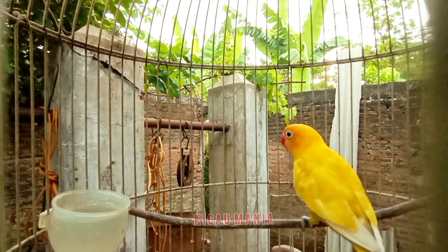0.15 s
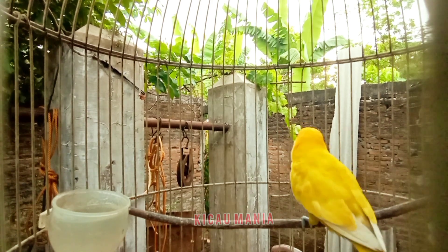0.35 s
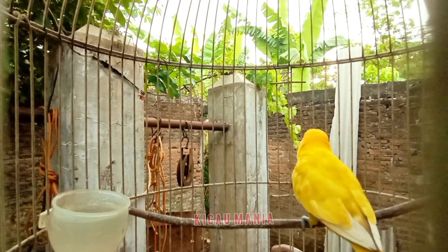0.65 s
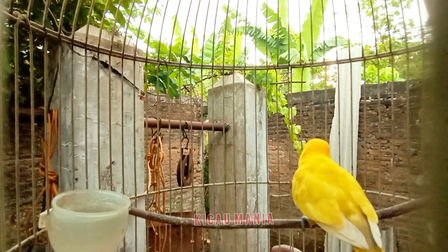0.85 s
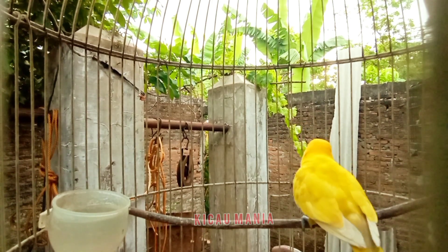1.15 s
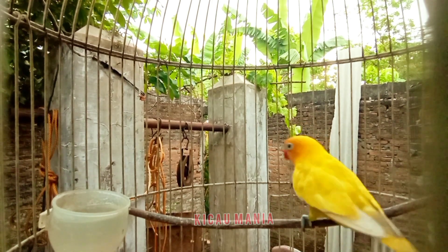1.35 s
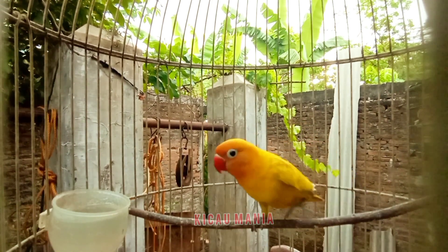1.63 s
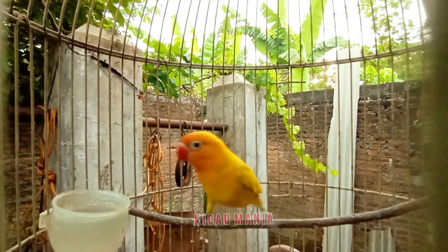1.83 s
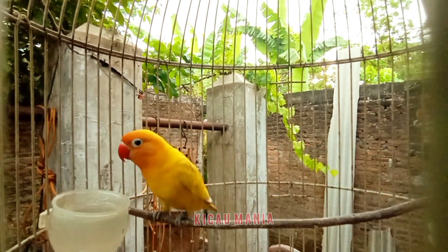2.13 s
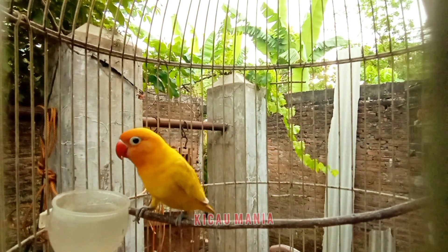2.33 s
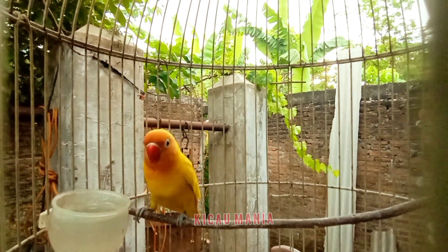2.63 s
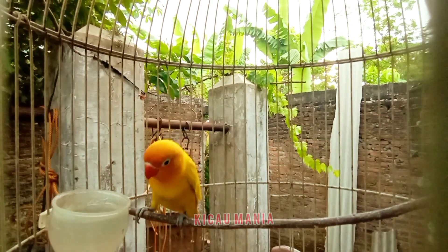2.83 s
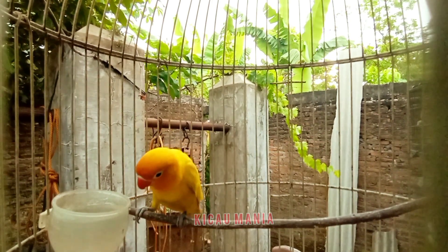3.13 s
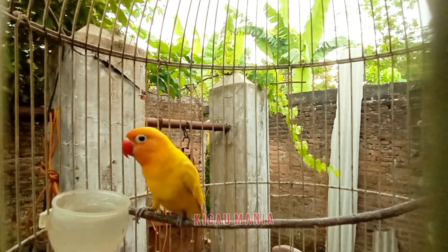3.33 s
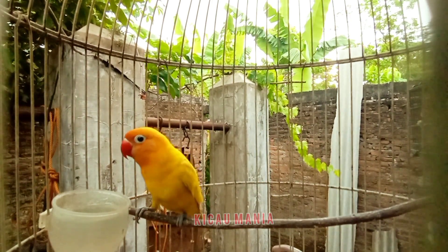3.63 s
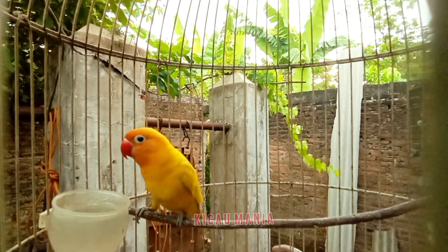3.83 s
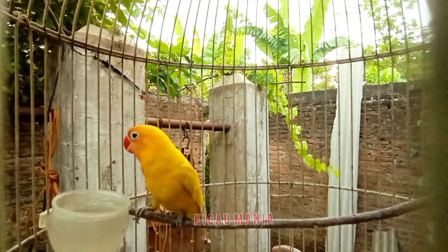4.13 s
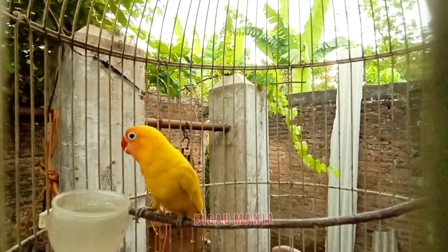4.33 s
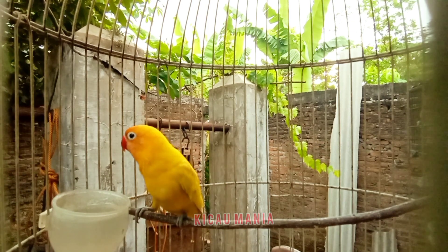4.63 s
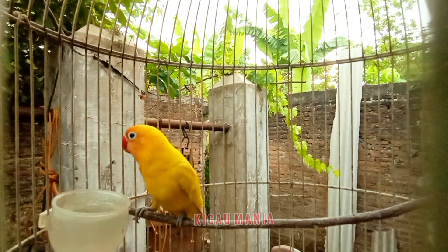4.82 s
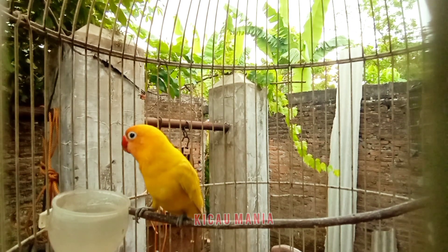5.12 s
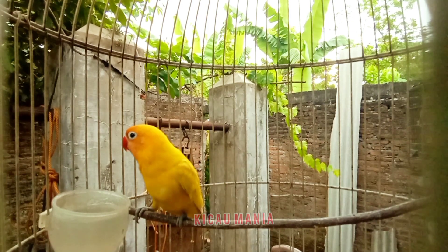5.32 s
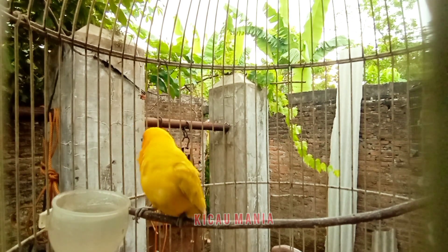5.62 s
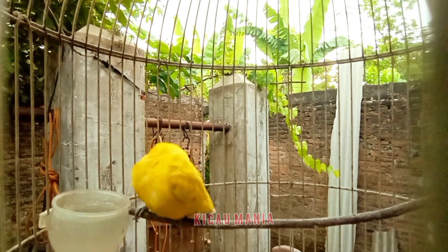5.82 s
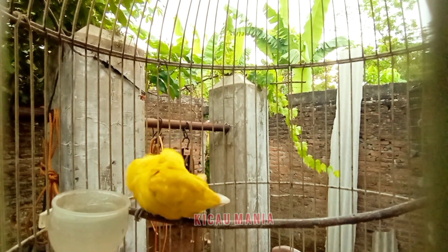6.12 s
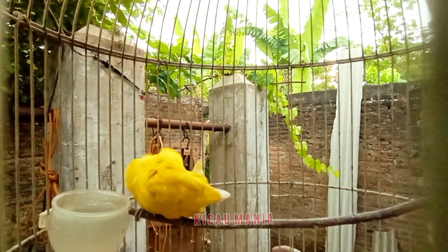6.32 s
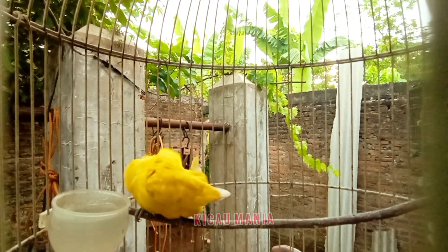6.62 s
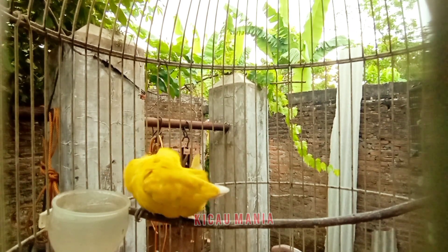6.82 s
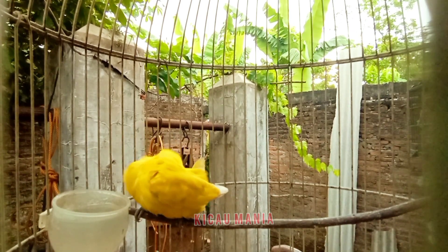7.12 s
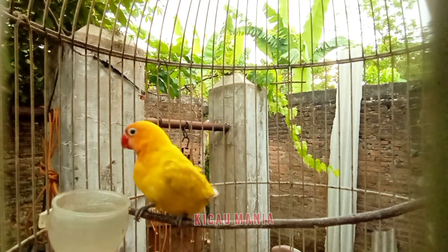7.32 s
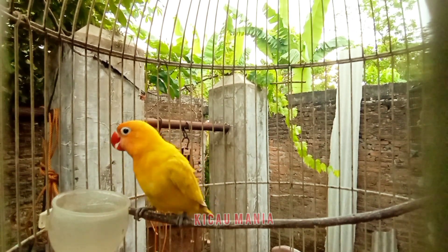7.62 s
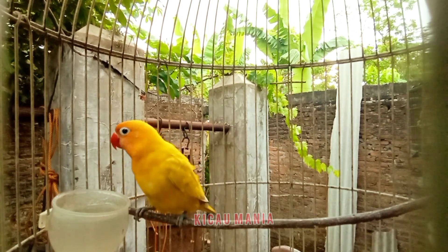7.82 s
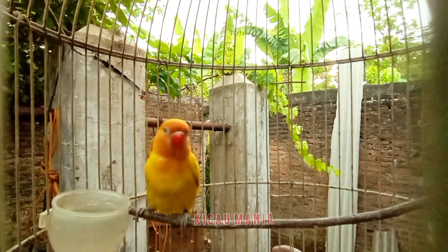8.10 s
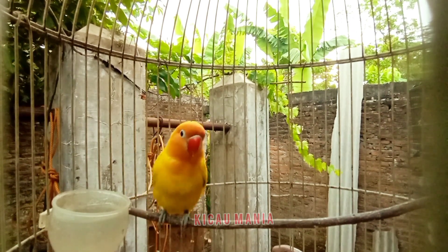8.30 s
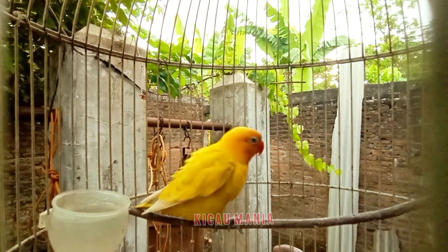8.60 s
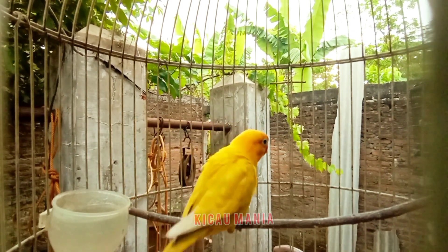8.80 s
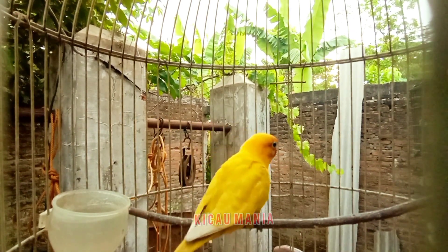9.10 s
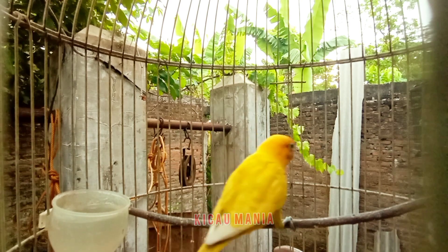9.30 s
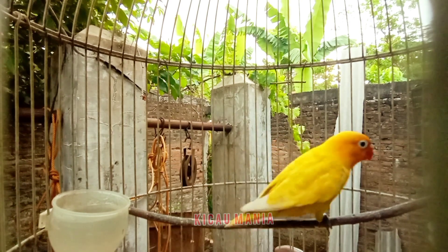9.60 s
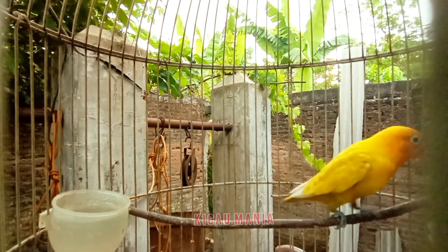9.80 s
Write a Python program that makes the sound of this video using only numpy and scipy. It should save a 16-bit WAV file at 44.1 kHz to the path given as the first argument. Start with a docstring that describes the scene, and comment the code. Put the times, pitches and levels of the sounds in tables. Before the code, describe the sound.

Very close to the microphone, a small parrot gives two tiny ticks, two zigzag chirps, then seven piercing short peeps. After a pause comes a chirp, a rising call and a squawk with a squeal. A brief feather rustle follows, then two peeps, another squawk and a steady run of eight loud chirps. Faint birds twitter and trill in a walled garden while engines and traffic rumble low.

```python
"""A caged lovebird calls close to a microphone in a walled garden: zigzag chirps, pure peeps, ticks, one rise
and two squawks, each a gliding harmonic tone filtered by the beak and thrown back by posts and walls.
Farther birds are whistled sines in reverberation; two engines are sums of exhaust orders; traffic is
coloured noise. The recorder's limiter ducks everything under the loudest calls."""
import sys
import numpy as np
from scipy import signal
from scipy.fft import rfft, irfft, next_fast_len
from scipy.io import wavfile
from scipy.ndimage import uniform_filter1d, map_coordinates

SR = 44100
rng = np.random.default_rng(int(sys.argv[2]) if len(sys.argv) > 2 else 0)


def store_wav(level_fs):
    """Save 16-bit WAV to argv[1]."""
    pcm = np.round(np.clip(np.atleast_2d(level_fs), -1, 1) * 32767)
    wavfile.write(sys.argv[1], SR, pcm.T.astype(np.int16))


N = 438794
TIME = np.arange(N) / SR
TOP_HZ = 15900  # upper band limit


def amp(db):
    """Decibel law: 20 dB is a tenfold amplitude."""
    return 10 ** (np.asarray(db) / 20)


def unit(x):
    """Normalization: scale to an rms of 1."""
    return x / np.sqrt(np.mean(x ** 2) + 1e-20)


def bell(t, centre, width):
    """Gaussian bump of height 1, falling to 1/e at width from the centre."""
    return np.exp(-((t - centre) / width) ** 2)


def along(points, hz):
    """Logarithmic frequency scale: interpolate (Hz, value) points on a log axis."""
    f, v = np.transpose(points)
    return np.interp(np.log(hz + 1), np.log(f + 1), v)


def curves(rows, t):
    """Linear interpolation: each column after the time, read at the times t."""
    s, *cols = np.transpose(rows)
    return [np.interp(t, s, c) for c in cols]


def wobble(rate, size):
    """Band-limited random modulation: a smooth curve through rate random knots a second."""
    knots = rng.standard_normal(int(size * rate / SR) + 4)
    return map_coordinates(knots, [np.arange(size) * rate / SR])


def filtered(x, response):
    """Linear filtering: the spectrum of x times a response of frequency."""
    m = next_fast_len(N + SR // 2)
    return irfft(rfft(x, m) * response(np.fft.rfftfreq(m, 1 / SR)), m)[..., :N]


def noise(spectrum, patchy_db=0):
    """Spectral shaping: coloured noise of rms 1, with drifting louder and softer patches."""
    z = signal.stft(rng.standard_normal(N), nperseg=1024)[2]
    field = uniform_filter1d(rng.standard_normal(z.shape), size=6, axis=0)
    field = uniform_filter1d(field, size=9, axis=1)
    patched = signal.istft(z * amp(patchy_db * unit(field)), nperseg=1024)[1][:N]
    return unit(filtered(patched, lambda hz: amp(along(spectrum, hz))))


def add(track, s, x):
    """Superposition: mix x into the track from second s on."""
    part = track[..., max(round(s * SR), 0):][..., :x.shape[-1]]
    part += x[..., :part.shape[-1]]


def envelope(size, attack_s, release_s):
    """Amplitude envelope: linear attack, hold and release."""
    t = np.arange(size) / SR
    return np.clip(np.minimum(t / attack_s, (t[-1] - t) / release_s), 0, 1)


def gesture(shape, stretch, ratio):
    """Joint frequency and amplitude modulation: pitch and strength of one note, sample by sample."""
    t = np.arange(int(shape[-1][0] * stretch * SR)) / SR / stretch
    hz, db = curves(shape, t)
    return hz * ratio, amp(db) * envelope(len(t), 0.00061, .0005)


# Reverberation of the garden. Each row: frequency in Hz, time to decay by 60 dB in seconds.
GARDEN = [(500, .3), (2500, 0.29), (5000, 0.33), (6500, 0.32), (10000, 0.32), (15000, 0.23)]


def garden_tail():
    """Diffuse reverberation: walls and leaves answer with decaying noise of energy 1."""
    hz, t, z = signal.stft(rng.standard_normal(SR // 2), SR, nperseg=256)
    decay_db = -60 * t / along(GARDEN, hz)[:, None]
    tail = signal.istft(z * amp(decay_db), SR, nperseg=256)[1]
    tail *= 1 - np.exp(-np.arange(len(tail)) / SR / 0.0091)  # gradual build-up
    return tail / np.linalg.norm(tail)


def near_echoes(count=10):
    """Early reflection: sharp echoes from the cage floor, cup and posts, of energy 1."""
    delay_s = rng.uniform(.002, .024, count)
    size = rng.choice([-1, 1], count) * np.exp(-delay_s / 0.013)
    return np.bincount((delay_s * SR).astype(int), size / np.linalg.norm(size))


# Course of the distant traffic. Each row: time in seconds, rumble in dB (before a 1.5 dB cut), tyre rush in dB.
TRAFFIC = [(0, -48.5, -59.5), (2.5, -53, -63), (3.4, -52.5, -63.5), (3.9, -54, -51.5), (6.4, -51, -48.5),
           (7.5, -49.5, -53), (8.8, -46, -45), (9.95, -48, -41.5)]
# Swells of the rush. Each row: peak time in seconds, time from peak to 1/e in seconds, peak level in dB.
SWELLS = [(5.46, .15, -44.5), (8.3, 0.14, -38.5), (9.5, 0.69, -41.5)]
# Spectrum of the rumble. Each row: frequency in Hz, relative level in dB per Hz.
RUMBLE = [(20, -38.5), (45, -20.5), (75, -7.5), (110, -1.5), (167, -6), (233, -7), (377, -12), (600, -16.5),
          (900, -27), (1500, -69.5)]
# Spectrum of the tyre rush. Each row: frequency in Hz, relative level in dB per Hz.
RUSH = [(300, -2.5), (600, -0.5), (1000, 1), (1130, -0.5), (1250, 9.5), (1420, 0), (2000, 1), (2800, -10),
        (4300, -16), (7000, -23), (10000, -36), (15500, -39.5)]


def traffic():
    """Incoherent summation: low rumble, and a rush whose power swells as vehicles go by."""
    rumble_db, rush_db = curves(TRAFFIC, TIME)
    rumble = amp(rumble_db - 1.5 + 1.3 * wobble(7, N)) * noise(RUMBLE, patchy_db=2.5)
    swell_power = sum((amp(db) * bell(TIME, s, width)) ** 2 for s, width, db in SWELLS)
    rush_level = np.sqrt(amp(rush_db) ** 2 + swell_power)
    rush = rush_level * amp(.9 * wobble(13, N)) * noise(RUSH, patchy_db=2.5)
    return rumble + rush


def engine(rate_hz, db, note, unsteady):
    """Harmonic orders: multiples of the rate, each wavering on its way through the gardens."""
    phase = 2 * np.pi * np.cumsum(rate_hz * (1 + unsteady * wobble(8.3, N))) / SR
    orders = 0
    for k, level_db in note:
        start_phase = rng.uniform(0, 2 * np.pi)
        orders = orders + amp(level_db + 3.6 * wobble(4, N)) * np.sin(k * phase + start_phase)
    return amp(db) * unit(orders)


# Level of the first engine. Each row: time in seconds, level in dB.
FIRST_LEVEL = [(.9, -40.5), (1.4, -49.5), (2.7, -52), (3.3, -49), (4, -48), (6, -59.5)]
# Exhaust note of the first engine. Each row: multiple of the firing rate, relative level in dB.
FIRST_NOTE = [(2, -29.5), (3, -12.5), (4, 1), (5, -5), (6, 0), (7, 0), (8, -14), (9, -7), (10, -10),
              (11, -7.5), (12, -9.5)]


def first_engine(start_hz=34.45, gain_hz_per_s=0.81):
    """Harmonic glide: every order climbs with the firing rate as this engine speeds up and leaves."""
    return engine(start_hz + gain_hz_per_s * TIME, *curves(FIRST_LEVEL, TIME), FIRST_NOTE, unsteady=0.0022)


# Resonance of throat and beak. Each row: frequency in Hz, gain in dB.
BEAK = [(600, -42), (1300, -27), (2100, -25.5), (3000, -10), (4000, -5.5), (5000, -0.5), (6000, -3.5),
        (7400, -7), (8000, -28), (8900, -19.5), (10000, -17.5), (13000, -29.5), (15500, -19.5)]
# What a full gape adds to it. Each row: frequency in Hz, added gain in dB.
GAPE = [(1500, -1), (2300, 9.5), (3000, 3), (3800, 0.5), (5000, -3.5), (6200, 0), (7300, 2), (8500, -1.5)]


def syrinx(hz, strength, rough, gape, rolloff_db=-7, low_rolloff_db=-3.5, rasp_db=-12, blur=0.4,
           hiss_db=-15, quaver=.013):
    """Source and filter: a gliding harmonic tone through the beak; rough notes flutter and split."""
    n = len(hz)
    hz = hz * (1 + .08 * rough * wobble(1400, n) + (quaver + .05 * rough) * wobble(350, n))
    strength = strength * amp((1 + 5.9 * rough) * wobble(599.5, n))
    phase = 2 * np.pi * np.cumsum(hz) / SR
    # Low notes are richer: their partials fall off less steeply.
    slope_db = np.interp(hz, [2800, 4600], [low_rolloff_db, rolloff_db])

    def beak(f):
        return amp(along(BEAK, f) + gape * along(GAPE, f)) * (f < TOP_HZ)

    def partial(k):
        # Cycles differ a little in shape, which blurs the upper partials.
        wave = np.sin(k * phase + blur * (k - 1) * wobble(1500, n))
        return beak(k * hz) * amp(slope_db * max(k - 1, 0)) * wave

    tone = sum(partial(k) for k in range(1, 8))
    # Uneven membrane cycles put a rasp halfway between the harmonics.
    rasp = sum(partial(k + .5) * wobble(1500, n) for k in range(3))
    # Air hisses through the beak.
    hiss_spectrum = rfft(rng.standard_normal(n)) * beak(np.fft.rfftfreq(n, 1 / SR))
    hiss = unit(irfft(hiss_spectrum, n))if n % 2 == 0 else unit(irfft(hiss_spectrum, n))
    # rasp_db holds at roughness 0.2, hiss_db at roughness 1.
    return strength * (tone + amp(rasp_db) * 5 * rough * rasp + amp(hiss_db) * rough * hiss)


# Shape of a tick. Each row: time in seconds before stretching, pitch in Hz before the ratio, effort in dB.
TICK = [(0, 2010, -21.5), (.0012, 2556, -2.5), (.004, 3100, 1), (.0052, 3930, -3.5), (.006, 4200, -23.5)]
# The ticks. Each row: start in seconds, effort in dB, stretch, pitch ratio, roughness 0-1, echo in dB,
# beak gape 0-1.
TICKS = [(0.029, 2.5, 0.95, 0.96, 0.2, 1.5, 0), (0.0878, 1.5, 1, 1, .11, -1, .3)]


def ticks():
    """Rapid frequency sweep: a few milliseconds of rising pitch are heard as a tick."""
    for s, db, stretch, ratio, rough, echo_db, gape in TICKS:
        yield s, db, echo_db, syrinx(*gesture(TICK, stretch, ratio), rough, gape)


# Three arches of pitch make a chirp. Each row: length in seconds before stretching, place of the crest 0-1,
# crest in Hz and end in Hz before the ratio, effort in dB.
ARCHES = [(.0062, .45, 5947, 4192, -1.5), (.0078, .55, 5056, 2702, 0), (.017, .42, 5350, 1550, 0)]


def chirp(stretch, ratio, start_hz=5400, rise_power=3.5, fall_power=1.5, dip_db=-4, attack_s=.004):
    """Coupled pitch and loudness: each arch leaps to a crest and plunges, weakening between arches."""
    hz, db, foot_hz = [], [], start_hz
    for length, crest, crest_hz, end_hz, effort_db in ARCHES:
        u = np.linspace(0, 1, int(length * stretch * SR))
        rise = np.abs(1 - u / crest) ** rise_power
        fall = np.abs((u - crest) / (1 - crest)) ** fall_power
        below = np.where(u < crest, rise, fall)  # 0 at the crest, 1 at either foot
        hz.append(crest_hz + below * (np.where(u < crest, foot_hz, end_hz) - crest_hz))
        db.append(effort_db + dip_db * below)
        foot_hz = end_hz
    hz, db = np.concatenate(hz), np.concatenate(db)
    return hz * ratio, amp(db) * envelope(len(hz), attack_s, .0005)


# The chirps. Each row: start in seconds, effort in dB, stretch, pitch ratio, roughness 0-1, echo in dB,
# beak gape 0-1.
CHIRPS = [ (0.646, -4, 1.15, 0.94, .35, 3, 0.3), (1.147, -3.5, 1.03, .94, .35, 3.5, .2),
          (4.07, -1.5, 1.05, 1, .33, 5, .25), (7.998, 1, 1, 0.96, 0.2, -1, 0),
          (8.345, -0.5, 1.07, 0.98, 0.4, -0.5, 0.2), (8.6409, 1, 1, .97, .26, 0.5, 0.1),
          (8.954, 1, .93, .97, .3, 0.5, 0), (9.25, 1, .94, 0.94, .3, 0, 0),
          (9.5125, 3, .97, 0.99, .15, -1, 0.02), (9.7772, 2.5, .91, .96, .2, 0, 0)]


def chirps():
    """Zigzag frequency modulation: the arched pitch drives the syrinx."""
    for s, db, stretch, ratio, rough, echo_db, gape in CHIRPS:
        yield s, db, echo_db, syrinx(*chirp(stretch, ratio), rough, gape, rolloff_db=-4.5)


def peep(length, lead_s, lead_hz, over_s, held_hz, lead_db=-8, lead_rise=0.11, overshoot=.17,
         sag_hz_per_s=7000, break_db=-11, break_s=.0009, release_s=.009):
    """Register break: a soft low lead-in jumps high, overshoots, catches and settles on a sagging tone."""
    t = np.arange(int(length * SR)) / SR
    high = np.clip((t - lead_s) / break_s + .5, 0, 1)  # 0 in the low register, 1 in the high
    arc = np.sin(np.pi * np.clip((t - lead_s) / over_s, 0, 1))
    # The sag reaches held_hz where the release begins.
    high_hz = held_hz * (1 + overshoot * arc) + sag_hz_per_s * (length - release_s - t)
    low_hz = lead_hz * (1 + lead_rise * t / lead_s)
    hz = (1 - high) * low_hz + high * high_hz
    breaks = bell(t, lead_s - break_s / 2, break_s) + bell(t, lead_s + over_s + 2 * break_s, break_s)
    return hz, amp(lead_db * (1 - high) + break_db * breaks) * envelope(len(t), 0.0016, release_s)


# The peeps. Each row: start in seconds, effort in dB, length in seconds, lead-in in seconds, lead-in start in Hz,
# overshoot in seconds, held pitch at the release in Hz, roughness 0-1, echo in dB.
PEEPS = [ (1.3814, 2, 0.039, 0.0067, 2910, 0.0049, 5030, .07, -0.5),
         (1.6293, 3, 0.032, 0.0047, 3040, .0045, 5040, 0.05, -2),
         (1.816, 3.5, 0.034, 0.0067, 3006, 0.006, 5044, 0.1, 0),
         (1.9923, 1.5, 0.033, .0062, 2960, 0.0039, 5026, 0.1, 1),
         (2.165, 3, .036, .0075, 2970, .0052, 5036, 0.04, -2),
         (2.3552, 3, 0.037, .0072, 3000, 0.0045, 5085, 0.09, 0.5),
         (2.569, 6, .029, .0045, 4350, 0.003, 5050, .06, -3),
         (7.311, -3, .032, .002, 3980, 0.0055, 4630, .3, 4.5),
         (7.4032, -3, 0.033, 0.0033, 4125, 0.0081, 5090, 0.07, 3)]


def peeps():
    """Spectral purity: steep rolloff of the upper partials leaves nearly a pure tone."""
    for s, db, length, lead_s, lead_hz, over_s, held_hz, rough, echo_db in PEEPS:
        pitch_and_strength = peep(length, lead_s, lead_hz, over_s, held_hz)
        yield s, db, echo_db, syrinx(*pitch_and_strength, rough, 0, rolloff_db=-8.5)


# Shape of the rising call. Each row: time in seconds before stretching, pitch in Hz before the ratio, effort in dB.
RISE = [(0, 3920, -5.5), (.003, 5194, 0.5), (.006, 6420, -4.5), (.009, 4180, -2.5), (.02, 4760, -1),
        (.024, 5150, 2), (.032, 5160, -1), (.036, 4990, -13.5)]


def rising_call(start_s=4.152, effort_db=-4.5, rough=0.12, echo_db=3.5):
    """Harmonic richness: one call leaps, drops and climbs again, with strong upper partials."""
    yield start_s, effort_db, echo_db, syrinx(*gesture(RISE, 0.95, 0.98), rough, 0, rolloff_db=-2)


def squawk(stretch, ratio, start_hz=1550, crest_hz=2800, end_hz=2150, crest_s=.0265, length_s=.05,
           warble_hz=150, warble=0.13, warble_s=0.0077, start_db=-16):
    """Vibrato: a low hump of pitch swells throughout and warbles around its crest."""
    t = np.arange(int(length_s * stretch * SR)) / SR / stretch
    hz = np.interp(t, [0, crest_s, length_s], [start_hz, crest_hz, end_hz])
    vibrato = np.cos(2 * np.pi * warble_hz * (t - crest_s))
    hz = hz * (1 + warble * bell(t, crest_s, warble_s) * vibrato)
    return hz * ratio, amp(start_db * (1 - t / length_s) ** 2) * envelope(len(t), .0005, 0.00046)


# Shape of a squeal. Each row: time in seconds before stretching, pitch in Hz before the ratio, effort in dB.
SQUEAL = [(0, 2618, -4.5), (.002, 5125, -0.5), (.007, 6414, -6.5), (.016, 5740, -13.5), (.02, 5270, 0),
          (.025, 5300, -2), (.03, 6020, -3.5), (.038, 5870, -9.5)]
# The squawks. Each row: start in seconds, effort in dB, stretch, pitch ratio, roughness 0-1, echo in dB,
# beak gape 0-1, squeal in dB relative to the squawk.
SQUAWKS = [(4.2333, 2.5, .98, 1, .22, 2.5, .8, -3), (7.4854, 2.5, 1.02, 0.97, 0.08, 0.5, .95, 1)]


def squawks():
    """Resonance shift: a wide gape colours each squawk and the squeal that trails it."""
    for s, db, stretch, ratio, rough, echo_db, gape, squeal_db in SQUAWKS:
        low = syrinx(*squawk(stretch, ratio), rough, gape)
        yield s, db, echo_db, low
        squeal = syrinx(*gesture(SQUEAL, stretch, ratio), rough, gape)
        yield s + len(low) / SR, db + squeal_db, echo_db, squeal


def lovebird(near_db=-12, tail_db=-15, spread_db=-19):
    """Direct and reflected sound: echoes follow every call and change as the bird turns."""
    out = np.zeros((2, N))
    calls = [*ticks(), *chirps(), *peeps(), *rising_call(), *squawks()]
    for s, db, echo_db, sound in calls:
        call = amp(db) * sound
        add(out, s, call)
        add(out, s, amp(near_db + echo_db) * signal.fftconvolve(call, near_echoes()))
        add(out, s, amp(tail_db + echo_db) * signal.fftconvolve(call, garden_tail()))
        # Left and right differ mostly in the treble: the difference of samples favours it.
        side = signal.fftconvolve(np.diff(call), near_echoes())
        add(out, s, amp(spread_db) * np.outer([1, -1], side))
    return out


def far_note(shape, ratio, wet, scatter=0.64, warble=.012):
    """Multipath propagation: a varied whistle, broken up by nearby walls and trailing into the garden."""
    hz, strength = gesture(shape, 0.95, ratio * (1 + .006 * rng.standard_normal()))
    hz = hz * (1 + warble * wet * wobble(400, len(hz)))
    note = amp(rng.normal(0, 0.73)) * strength * np.sin(2 * np.pi * np.cumsum(hz) / SR)
    heard = wet * signal.fftconvolve(note, garden_tail())
    add(heard, 0, scatter * signal.fftconvolve(note, near_echoes()))
    add(heard, 0, max(1 - wet, 0) * note)
    return heard


# Song shapes of the farther birds, all later shortened by 5 % and scaled in pitch.
# Each row: time in seconds, pitch in Hz, effort in dB.
TSIP = [(0, 7070, -6.5), (.008, 6440, -1.5), (.016, 6256, -0.5), (.03, 6150, -11.5), (.04, 5974, -28.5)]
COO = [(0, 2220, -11), (.025, 2300, 0.5), (.055, 2450, 2), (.08, 2380, -23)]
SWOOP = [(0, 2900, -3.5), (.02, 4600, -1.5), (.035, 3800, 5.5), (.05, 3740, -2), (.06, 3100, 1.5),
         (.08, 3000, -7.5), (.1, 2520, -12.5)]
TWITTER = [(0, 2454, -8), (.012, 3306, 3), (.024, 2793, -3.5), (.036, 3800, -1.5), (.05, 3006, -5)]
WHISTLE = [(0, 4700, 0), (.06, 4790, -0.5), (.2, 4800, -4.5), (.28, 4800, -30)]
SLIDE = [(0, 2280, -10), (.07, 2550, -2), (.13, 2850, 0), (.19, 2950, -12)]
UPSLUR = [(0, 2008, -6.5), (.015, 2623, 2.5), (.035, 3435, 0.5), (.055, 3560, 2), (.085, 3540, -4.5),
          (.1, 3400, -38)]
# Voices by name. Each row: shape, level in dB, pitch ratio, echo share.
VOICES = { "coo": (COO, -44.5, 1, 0.35), "high coo": (COO, -42, 1.16, 0.38),
          "swoop": (SWOOP, -45, 0.97, 0.73), "low swoop": (SWOOP, -44, .8, 0.77),
          "twitter": (TWITTER, -39.5, 0.99, 0.9), "high twitter": (TWITTER, -45, 1.55, 1),
          "slide": (SLIDE, -44.5, 1, 0.32), "whistle": (WHISTLE, -57.5, 1, 0.86),
          "upslur": (UPSLUR, -40, 0.98, 0.48)}
# One note repeated at an even pace. Each row: voice, first note in seconds, last note in seconds, count.
PHRASES = [ ("swoop", .17, 1.44, 4), ("high coo", .19, .26, 2), ("high twitter", .39, .82, 2),
           ("high coo", .5, .93, 2), ("coo", 1.29, 1.56, 2), ("swoop", 1.71, 3.583, 9),
           ("coo", 1.822, 3.701, 9), ("whistle", 3.4, 3.68, 2), ("twitter", 4.88, 5.536, 7),
           ("upslur", 5.797, 6.699, 9), ("upslur", 6.828, 7.986, 11), ("upslur", 8.11, 9.36, 12)]
# Lone notes. Each row: start in seconds, voice.
LONE_NOTES = [(3.89, "low swoop"), (4.42, "whistle"), (4.55, "slide"), (4.76, "low swoop"),
              (4.91, "high coo"), (5.66, "high twitter"), (9.58, "slide"), (9.68, "swoop")]
# A thin, even trill. Each row: first note in seconds, step between notes in seconds, last note in seconds.
TRILL = [(.085, .095, .56), (.85, .0927, 4.0), (4.46, .0923, 5.94), (6.115, .0954, 9.8)]


def far_birds(trill_db=-47):
    """Periodic repetition: phrases of the neighbouring birds and a high trill, among lone notes."""
    out = np.zeros(N)
    notes = list(LONE_NOTES)
    for voice, first, last, count in PHRASES:
        notes += [(s, voice) for s in np.linspace(first, last, count)]
    for s, voice in notes:
        shape, db, ratio, wet = VOICES[voice]
        add(out, s, amp(db) * far_note(shape, ratio, wet))
    for first, step, last in TRILL:
        for s in np.arange(first, last + step / 2, step):
            add(out, s, amp(trill_db) * far_note(TSIP, 0.98, wet=0.33, warble=0.039))
    return out


def beak_taps(tap_db=-36, t60=0.016):
    """Impulsive excitation: soft dry clicks of decaying noise just before some of the calls."""
    out, t = np.zeros(N), np.arange(SR // 50) / SR
    for s in [1.123, 1.361, 1.606, 1.971, 2.146, 2.543, 8.619, 9.49]:
        add(out, s, amp(tap_db - 60 * t / t60))
    return out * noise([(500, -12), (2000, 1), (4000, -4), (7000, -7.5), (12000, -30.5)])


# Level of the rough beating. Each row: time in seconds, level in dB.
THROB_LEVEL = [(2.3, -78.5), (3.4, -55.5), (4.9, -52), (5.3, -46), (6.8, -54), (7.9, -49), (8.3, -43),
               (9.95, -43.5)]
# Spectrum of the uneven firing. Each row: frequency in Hz, relative level in dB per Hz.
THROB = [(18, -24.5), (35, -13.5), (65, -8.5), (95, 2.5), (125, -1.5), (180, -13.5), (400, -32.5),
         (800, -70.5)]


def throb():
    """Narrow-band noise: its random envelope is the rough low beating of the second engine as it nears."""
    db, = curves(THROB_LEVEL, TIME)
    return amp(db) * noise(THROB, patchy_db=2.5)


# The second engine draws near. Each row: time in seconds, firings a second, level in dB.
SECOND_ENGINE = [(4.1, 49, -85.5), (4.7, 48.9, -57.5), (6.1, 48.8, -47), (6.8, 50.52, -43.5),
                 (7.8, 50.58, -44), (8.3, 46.98, -46.5), (8.8, 53.02, -45), (9.95, 54.8, -40.5)]
# Exhaust note of the second engine. Each row: multiple of the firing rate, relative level in dB.
SECOND_NOTE = [(1, -1), (2, -7), (3, -14.5), (4, -15), (5, -15.5), (6, -18)]


def second_engine():
    """Tone plus noise: regular firing gives the low orders, uneven firing the throb."""
    return engine(*curves(SECOND_ENGINE, TIME), SECOND_NOTE, unsteady=.012) + throb()


def feathers():
    """Frictional noise: a short bright rustle as the bird turns to preen."""
    # Each row: time in seconds, level in dB.
    level_db, = curves([(5.84, -110), (5.862, -43.5), (5.88, -43.5), (5.895, -53.5), (5.96, -71.5),
                        (6.05, -110)], TIME)
    return amp(level_db) * noise([(3500, -24.5), (5000, 5.5), (9000, 0.5), (15500, -3.5)])


def scene():
    """Superposition: the lovebird in front; other birds, engines and traffic behind."""
    background = traffic() + first_engine() + far_birds() + second_engine()
    return lovebird() + beak_taps() + feathers() + background


def record(dry, ceiling=0.96, release_db=45):
    """Peak limiting: fast gain reduction recovers at release_db a second, then the band limit."""
    over_db = 20 * np.log10(np.maximum(np.abs(dry).max(axis=0) / ceiling, 1))
    duck_db = np.maximum.accumulate(over_db + release_db * TIME) - release_db * TIME
    limited = np.clip(dry * amp(-uniform_filter1d(duck_db, size=40)), -1, 1)
    return filtered(limited, lambda hz: hz < TOP_HZ)


dry = scene()
out = record(dry)
store_wav(out)
```